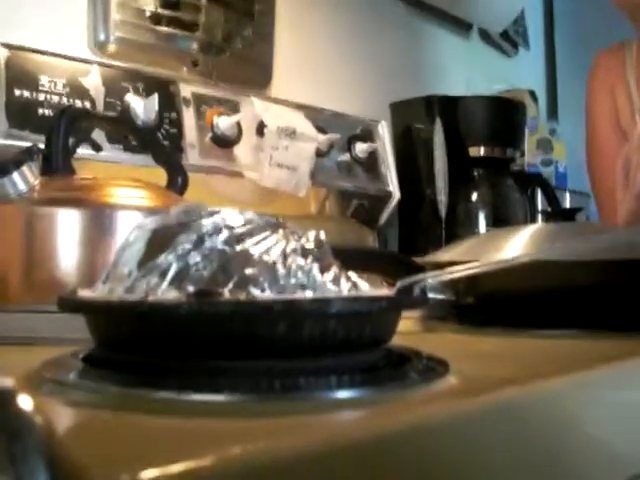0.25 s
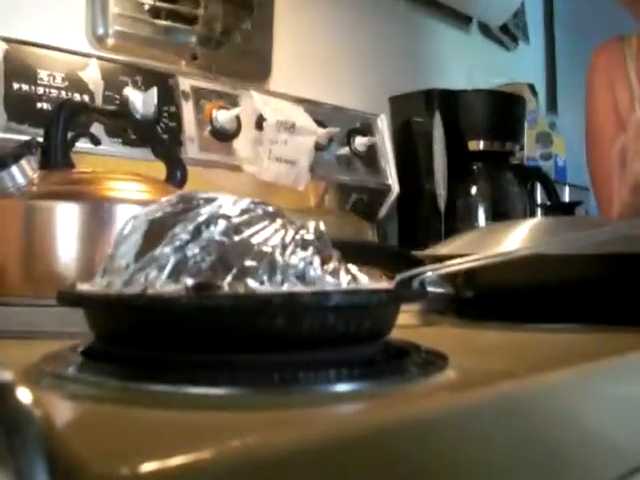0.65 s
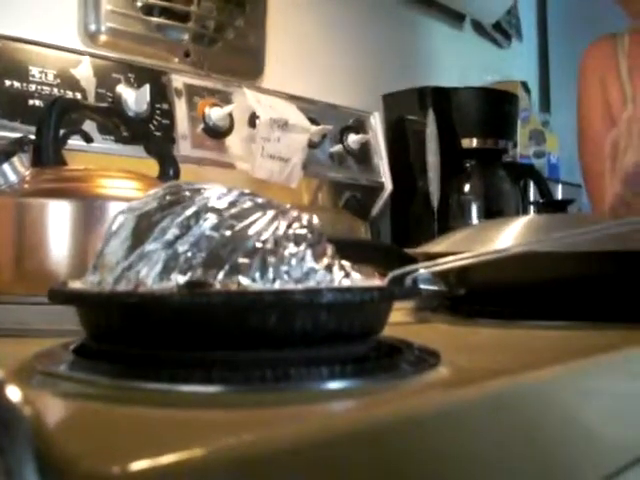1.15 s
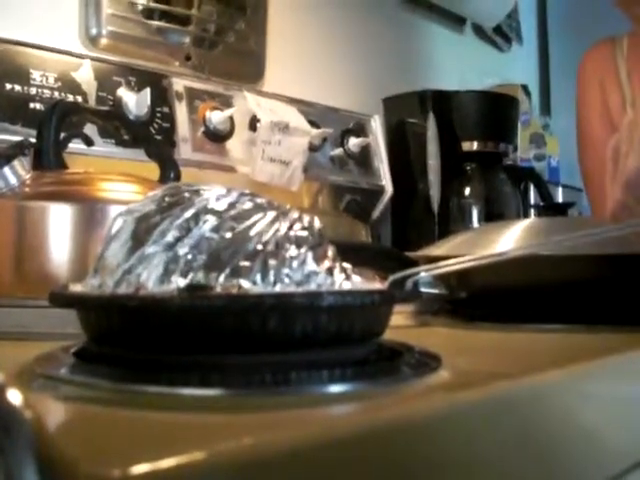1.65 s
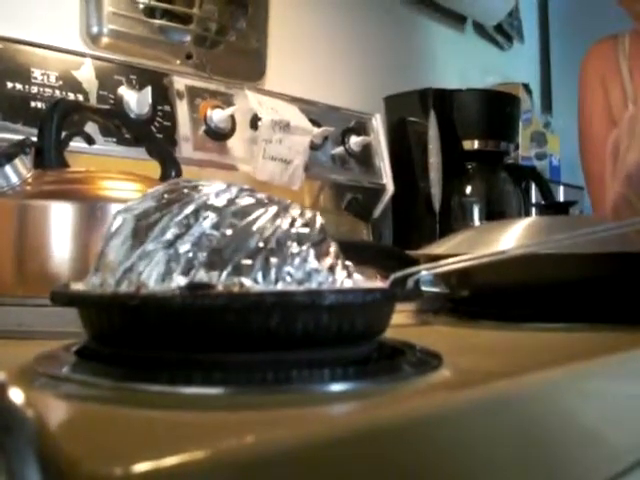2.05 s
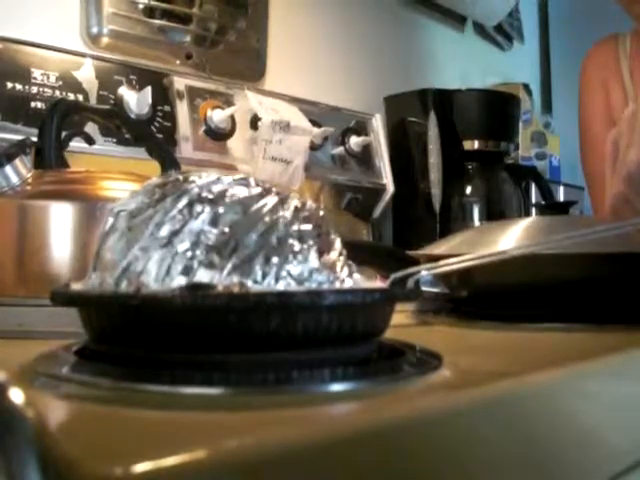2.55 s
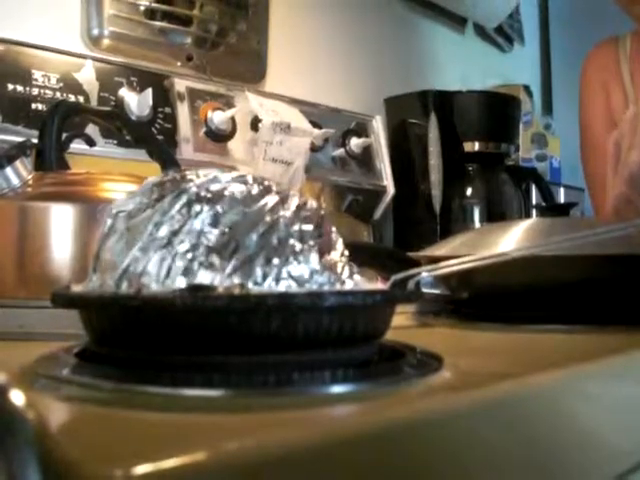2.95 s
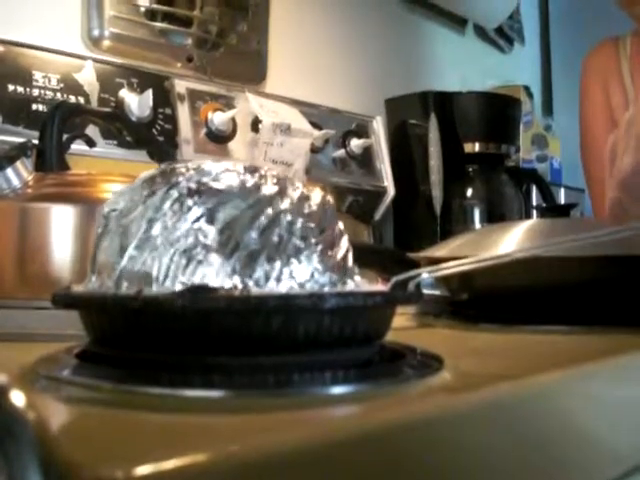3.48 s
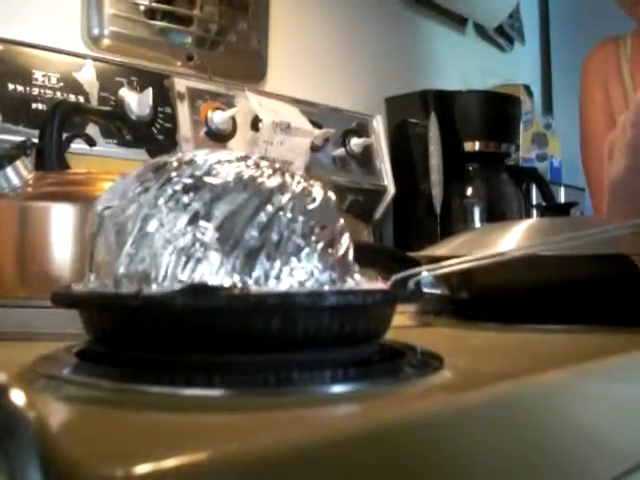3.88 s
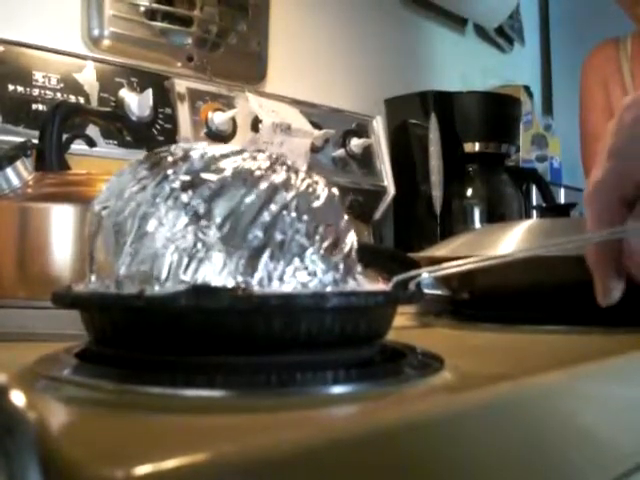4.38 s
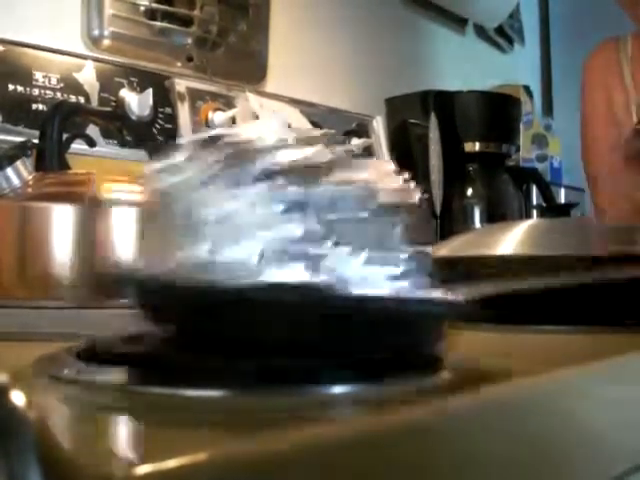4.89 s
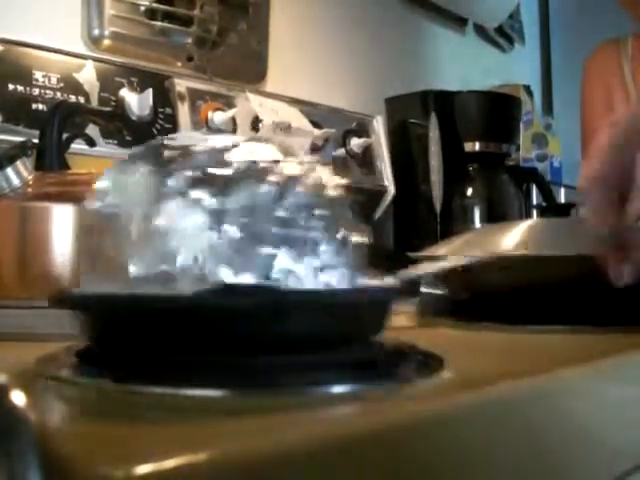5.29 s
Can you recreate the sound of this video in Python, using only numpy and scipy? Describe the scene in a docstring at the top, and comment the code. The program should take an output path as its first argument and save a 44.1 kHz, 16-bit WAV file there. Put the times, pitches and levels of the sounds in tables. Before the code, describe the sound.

Popcorn bursts in a foil-domed pan on a stove: sharp bright cracks with short metallic rustles and soft thuds, irregularly spaced, then denser after three seconds. Faint oil sizzle dips and returns. From about 4.6 seconds the pan is shaken, scraping back and forth ever faster with rattling kernels. Close microphone, small dry kitchen, very faint hum.

```python
"""Popcorn pops in a foil-domed pan on an electric stove, over faint appliance hum and room air.
Throughout, oil sizzles: filtered random impacts whose level sinks in the first half, then revives unevenly.
Pops, and sharp follow-up hits of kernels on the dome, each sound as a crack, foil rustle, puff and thud;
ticks of the swelling foil (damped modes) and dull knocks of landing corn (noise bursts) fall between.
Near the end the shaken pan scrapes in quickening strokes: grit noise gated by the speed of the hand."""
import sys
import numpy as np
from scipy import signal
from scipy.fft import rfft, irfft, next_fast_len
from scipy.io import wavfile
from scipy.ndimage import map_coordinates

SR = 44100
rng = np.random.default_rng(int(sys.argv[2]) if len(sys.argv) > 2 else 0)


def to_wav(sig):
    """Store sig (one row per channel, or 1-D mono) as 16-bit WAV at the path in sys.argv[1].

    Samples outside -1..1 are clipped; the rate is SR.
    """
    pcm = np.clip(np.atleast_2d(sig), -1, 1) * 32767
    pcm = np.round(pcm).astype(np.int16)
    wavfile.write(sys.argv[1], SR, pcm.T)  # frames by channels


N = 243873
TIME = np.arange(N) / SR
AGE = np.arange(SR // 8) / SR  # time since the start of one hit [s]

# strikes, which are pops and the sharp follow-up hits of kernels on the dome:
# (time [s], crack level [dB], crack pitch [Hz], foil rustle level [dB], thud level [dB])
STRIKES = [(.215, -18, 3490, -27, -38), (0.2448, -24, 3900, -36.5, -52.5), (.394, -43, 3440, -37, -49.5),
           (.584, -19.5, 4260, -27, -40), (0.8245, -19.5, 4130, -27, -40), (.853, -11, 3620, -25.5, -41),
           (1.0132, -37, 3450, -34.5, -49), (1.2875, -20, 4620, -33.5, -46),
           (1.94, -17.5, 3770, -37.5, -52), (1.9557, -45, 3520, -42, -53), (1.972, -38, 3900, -39, -57),
           (2.0846, -21.5, 3380, -23, -50), (2.1265, -27.5, 4760, -35.5, -52),
           (2.1501, -39, 3500, -40, -47.5), (2.4871, -29, 3330, -45.5, -53.5),
           (2.5036, -36.5, 4300, -46.5, -76), (2.5708, -21, 3450, -29, -63), (2.6102, -30, 3980, -39, -64),
           (2.8113, -24, 4120, -40, -55), (3.0442, -23, 3100, -35.5, -43.5),
           (3.0708, -24.5, 3220, -38, -48.5), (3.1092, -40, 3420, -27, -34),
           (3.1404, -40, 4630, -42.5, -50.5), (3.1843, -26, 3900, -32.5, -53.5),
           (3.3108, -12.5, 3200, -36, -41.5), (3.448, -42, 4850, -38, -44.5),
           (3.588, -24.5, 4340, -35.5, -41), (3.6014, -21, 3500, -33, -49), (3.619, -26.5, 3170, -35, -39),
           (3.7735, -31.5, 3650, -34, -44), (3.9086, -17.5, 5040, -27.5, -45.5),
           (4.0345, -50, 3970, -41.5, -50.5), (4.169, -52, 3330, -38.5, -49),
           (4.3274, -21, 4530, -30.5, -54), (4.3939, -20.5, 3470, -31, -43), (4.5127, -38, 4070, -50, -51),
           (4.8364, -26, 4160, -31, -48), (4.8432, -19.5, 4400, -33, -46.5),
           (5.0096, -34, 3900, -35.5, -53), (5.176, -22.5, 2730, -31, -49.5), (5.3412, -24, 4630, -31, -48),
           (5.3611, -29, 3740, -35.5, -55), (5.4479, -23, 3600, -45, -48),
           (5.4662, -26.5, 3930, -36.5, -50), (5.499, -41, 4430, -38, -42.5)]
# creases of the foil snapping over: (time [s], level [dB], pitch [Hz])
FOIL_SNAPS = [(.292, -37.5, 2580), (0.4145, -30, 2700), (.4455, -23.5, 2980), (.7106, -31, 2900),
              (.75, -45, 3800), (.954, -43, 3600), (2.2537, -43.5, 2950), (2.644, -38, 3110),
              (2.914, -37, 4300), (3.158, -33, 3900), (3.5017, -41.5, 3000), (3.664, -37.5, 3370),
              (3.7011, -34, 3020), (3.7127, -36.5, 3000), (3.8411, -24.5, 3040), (3.987, -36, 3630),
              (4.0084, -21, 3340), (4.052, -33.5, 3300), (4.278, -45, 4250), (4.5548, -36.5, 3600),
              (5.027, -28.5, 4200), (5.2175, -32, 3650), (5.293, -29, 3260)]
# knocks of corn against the pan: (time [s], level [dB], pitch [Hz])
LANDINGS = [(.282, -39.5, 950), (.524, -45, 497), (.638, -36, 753), (.678, -42, 935), (.792, -46.5, 900),
            (.94, -45, 890), (1.028, -36.5, 627), (1.086, -45.5, 920), (1.397, -43.5, 965),
            (1.44, -42.5, 900), (2.022, -38.5, 970), (2.0869, -22.5, 930), (2.215, -50.5, 838),
            (2.83, -44, 450), (3.06, -35, 397), (3.335, -35.5, 590), (3.462, -36.5, 646),
            (3.504, -42.5, 526), (3.798, -30.5, 420), (4.254, -45.5, 760), (4.486, -37, 530)]
# effort of the shaking hand: (time [s], level [dB])
EFFORT = [(4.4, -69), (4.55, -52), (4.66, -48.5), (4.74, -44), (4.9, -38), (5.22, -37), (5.53, -40.5)]
# strength of the sizzling oil: (time [s], level [dB])
OIL_LEVEL = [(0, -59), (1.1, -61), (1.7, -66.5), (2.4, -69), (3.3, -61), (4.1, -64), (5.53, -58)]

# The spectra give relative levels.
# crumpled foil: (frequency [Hz], level [dB per Hz])
FOIL_SPECTRUM = [(60, -28), (150, -45), (300, -27), (600, -19.5), (900, -15.5), (1500, -11), (2300, -4),
                 (3200, 0.5), (4400, -2.5), (6000, -6), (8000, -11.5), (12000, -18)]
# corn tumbling against the dome: (frequency [Hz], level [dB per Hz])
THUD_SPECTRUM = [(35, -29), (75, -21), (165, -16), (260, -18.5), (370, -0.5), (500, 2), (630, 0.5),
                 (820, 1.5), (1050, -2.5), (1500, -5.5), (3000, -2), (8000, -76)]
# low puff: (frequency [Hz], level [dB per Hz])
PUFF_SPECTRUM = [(30, -30), (55, -15), (75, -7), (110, -1.5), (170, 2), (250, -4.5), (400, -11.5),
                 (900, -38), (3000, -69)]
# pan sliding on the burner: (frequency [Hz], level [dB per Hz])
SCRAPE_SPECTRUM = [(40, -47), (80, -16.5), (170, -6.5), (270, -17), (400, -9.5), (700, -5.5), (1010, -3.5),
                   (1700, -10), (2500, -4.5), (3400, 1), (4500, -3), (5800, -13.5), (8000, -21),
                   (12000, -29.5)]
# hard kernels on the pan: (frequency [Hz], level [dB per Hz])
KERNEL_SPECTRUM = [(60, -52), (250, -12), (450, -10), (650, -9.5), (920, 1), (1500, -4), (2300, -10),
                   (3100, 6), (5000, -18), (12000, -36)]
# hot oil: (frequency [Hz], level [dB per Hz])
SIZZLE_SPECTRUM = [(200, -7), (900, 6), (1600, -1.5), (3400, 4.5), (4800, 6.5), (7000, -2.5), (9000, -12),
                   (12000, -9.5)]
# air of the kitchen: (frequency [Hz], level [dB per Hz])
KITCHEN_SPECTRUM = [(25, 0), (45, -21), (70, -15), (95, 1), (130, -14), (190, -1.5), (300, -13.5),
                    (390, -2.5), (520, -13), (1000, -17.5), (2500, -12), (12000, -23.5)]
# appliance tones: (frequency [Hz], mean peak level [dB])
HUM_TONES = [(70, -79), (119, -81), (241, -78), (381, -78)]
# resonances of the pan and its dome: (frequency [Hz], width [Hz], boost of each alone [dB])
PAN_MODES = [(167, 50, 0), (369.3, 22, 3.5), (494, 25, 2.5), (810, 62, 1.5), (1030, 43, 4),
             (3290, 254, 2.5), (4195, 41, 0.5)]
# decay of the diffuse tail: (frequency [Hz], time to fall by 60 dB [s])
ROOM_DECAY = [(150, 0.34), (900, 0.26), (3500, 0.13), (7000, 0.17), (12000, 0.2)]
# echoes of stove top, back panel and hood: (mean delay [s], level [dB])
WALL_ECHOES = [(.0027, -15.5), (.0052, -25.5), (.0061, -18), (0.0095, -30)]

# Delays, levels and pitches of the next three are typical values, scattered from strike to strike.
# a light tick just ahead of the strike: lead time, pitch, level relative to the rustle
LEAD_S, LEAD_HZ, LEAD_DB = .004, 3640, -14.5
# a low knock on the dome soon after: delay, pitch, level relative to the thud
DOME_S, DOME_HZ, DOME_DB = .021, 478, -2
# corn drops back into the pan: delay, pitch, level relative to the rustle
FALL_S, FALL_HZ, FALL_DB = 0.068, 900, -17
PUFF_DB = -11.5  # low puff, relative to the thud
# a higher crack brings a brighter rustle
TREBLE_DB, TREBLE_DB_PER_OCTAVE, USUAL_CRACK_HZ = -3, 21, 3720
# kick of a usual strike on the pan; dB more per dB of rustle and of thud
KICK_DB, KICK_WITH_RUSTLE, KICK_WITH_THUD = -48, .7, 0.51
USUAL_RUSTLE_DB, USUAL_THUD_DB = -36.5, -48.5
# middle of a stroke, stroke rate at that moment, steady rise of the rate
STROKE_MIDDLE_S, STROKES_PER_S, QUICKEN_PER_S2 = 4.56, 11.3, 2.53
STROKE_WIDTH, SLIDE_DB = 0.3, -11  # half length in periods; corn sliding on between the strokes
RATTLE_PER_S, RATTLE_DB = 150, -8.5  # hard kernels in the shaken pan, relative to the scrape
CALM, SETTLE_S = 0.071, .12  # unrest of the heap between strikes; time constant of settling after one
BAND_LIMIT_HZ = 12250


def strikes():
    """Impulsive excitation: a pop or a sharp hit on the dome cracks, kicks the pan, rustles, puffs and thuds."""
    track = np.zeros(N)
    size = len(AGE)
    for s, crack_db, hz, rustle_db, thud_db in STRIKES:
        snap = amp(crack_db) * crack(hz, t60=0.0073, edge_db=-11, pan_db=-26.0)

        treble_db = TREBLE_DB + TREBLE_DB_PER_OCTAVE * np.log2(hz / USUAL_CRACK_HZ)
        foil = amp(rustle_db) * rustle(hz, treble_db)

        more_rustle_db = rustle_db - USUAL_RUSTLE_DB
        more_thud_db = thud_db - USUAL_THUD_DB
        kick_db = KICK_DB + KICK_WITH_RUSTLE * more_rustle_db + KICK_WITH_THUD * more_thud_db
        pan_modes = ring(rng.uniform(695, 893), 0.045) + ring(rng.uniform(950, 960), 0.028)
        kick = amp(kick_db) * sized(pan_modes, 0.0069)

        bumps = grains(rate=700, spread_db=4.5, size=size) + 0.11 * rng.standard_normal(size)
        onset = 1 - np.exp(-AGE / 0.0019)  # the tumbling takes a moment to build up
        tumble = bumps * onset * amp(-60 * AGE / 0.08)
        thud = amp(thud_db) * sized(coloured(tumble, THUD_SPECTRUM), 0.042)

        breath = rng.standard_normal(size) * amp(-60 * AGE / 0.057)
        puff = amp(thud_db + PUFF_DB) * sized(coloured(breath, PUFF_SPECTRUM), 0.029)
        add(track, s, in_room(snap + foil + kick + thud + puff, wet_db=-13))
    return track


def crack(hz, t60, edge_db, pan_db):
    """Modal excitation: a sudden blow rings two close crease modes, a sharp edge and the hollow of the pan."""
    low_mode = ring(hz * rng.uniform(.93, .99), t60)
    high_mode = ring(hz * rng.uniform(1.1, 1.167), 0.35 * t60)
    crease = sized(low_mode + 0.77 * high_mode, 0.89)
    burst = rng.standard_normal(len(AGE)) * amp(-60 * AGE / .007)
    edge = sized(coloured(burst, [(100, -19), (700, 6.0), (4000, 12), (12000, -5.5)]), 0.53)
    hollow = ring(rng.uniform(746, 1350), 0.015)
    return sized(crease + amp(edge_db) * edge + amp(pan_db) * hollow, 0.0014)


def rustle(hz, treble_db):
    """Noise and chained buckling: the foil hisses and a quick chain of smaller crease cracks runs through it."""
    size = len(AGE)
    spray = rng.standard_normal(size) * amp(4.4 * wobble(909, size) - 60 * AGE / 0.07)
    spray = coloured(own_colour(spray, depth_db=2), FOIL_SPECTRUM)
    moments = np.cumsum(rng.uniform(.0008, .0035, size=10))
    buckles = np.zeros(size)
    buckles[(moments * SR).astype(int)] = amp(5.7 * rng.standard_normal(len(moments)) - 60 * moments / 0.031)
    small_crack = crack(hz, t60=0.0028, edge_db=-8.0, pan_db=-18)
    chain = signal.fftconvolve(buckles, small_crack)[:size]
    mixed = sized(spray, 1) + .6 * sized(chain, 1)
    return sized(coloured(mixed, [(3500, 0.0046), (8000, treble_db)]), 0.017)


def own_colour(x, depth_db):
    """Irregular modal response: every spot of the crumpled dome favours different frequencies."""
    hz = np.geomspace(200, 12000, 22)
    return coloured(x, np.column_stack([hz, depth_db * rng.standard_normal(len(hz))]))


def foil_snaps():
    """Snap-through buckling: creases of the dome flip over, and a like tick leads each strike."""
    track = np.zeros(N)
    lead_ticks = with_strikes("rustle", -LEAD_S, LEAD_DB, LEAD_HZ, scatter=.3)
    for s, db, hz in FOIL_SNAPS + lead_ticks:
        tick = crack(hz, t60=0.0045, edge_db=-8.5, pan_db=-11.5)
        tick = coloured(tick, [(hz / 2, -5), (hz, 0), (2 * hz, -6), (3 * hz, -15)])
        add(track, s, in_room(amp(db) * sized(tick, 0.0014), wet_db=-8.5))
    return track


def landings():
    """Soft, heavily damped impact: corn lands on several lobes in turn, a dull, barely ringing knock."""
    track = np.zeros(N)
    on_dome = with_strikes("thud", DOME_S, DOME_DB, DOME_HZ, scatter=.2)
    in_pan = with_strikes("rustle", FALL_S, FALL_DB, FALL_HZ, scatter=.3)
    for s, db, hz in LANDINGS + on_dome + in_pan:
        lobes = rng.standard_normal(len(AGE)) * amp(-60 * AGE / 0.017)
        spectrum = [(hz / 4, -16), (0.78 * hz, -7), (hz, 0), (1.5 * hz, -9), (4 * hz, -23), (12000, -45)]
        knock = coloured(lobes, spectrum)
        add(track, s, in_room(amp(db) * sized(knock, 0.0012), wet_db=-10.0))
    return track


def with_strikes(column, delay_s, level_db, hz, scatter):
    """Correlated events: each strike yields one (s, dB, Hz) event tied to its rustle or thud, with scatter."""
    events = []
    for s, _, _, rustle_db, thud_db in STRIKES:
        late, loud, high = rng.standard_normal(3)
        source_db = {"rustle": rustle_db, "thud": thud_db}[column]
        moment = s + delay_s * np.exp(scatter * late)
        events.append((moment, source_db + level_db + 2 * loud, hz * np.exp(0.15 * high)))
    return events


def shaking():
    """Sliding friction: the pan scrapes in quickening strokes as corn slides and hard kernels rattle."""
    elapsed = TIME - STROKE_MIDDLE_S
    strokes = STROKES_PER_S * elapsed + QUICKEN_PER_S2 * elapsed ** 2 / 2
    speed = np.exp(-((strokes - np.round(strokes)) / STROKE_WIDTH) ** 2)
    grit = unit(coloured(grains(rate=5000, spread_db=3.5, size=N), SCRAPE_SPECTRUM))
    kernels = grains(rate=RATTLE_PER_S, spread_db=4, size=N)
    rattle = amp(RATTLE_DB) * unit(coloured(kernels, KERNEL_SPECTRUM))
    effort = amp(curve(EFFORT) + 1.3 * wobble(90, N))  # very faint until the shaking sets in
    return in_room((grit + rattle) * (speed + amp(SLIDE_DB)) * effort, wet_db=-8)[:N]


def jostling():
    """Relaxing impact rate: taps and crinkles come more often after each strike, most after a loud rustle."""
    unrest = CALM
    for s, _, _, rustle_db, _ in STRIKES:
        settling = (TIME > s) * np.exp(-np.abs(TIME - s) / SETTLE_S)
        unrest = unrest + amp(rustle_db - USUAL_RUSTLE_DB) * settling
    taps = amp(-34.5) * coloured(grains(rate=38 * unrest, spread_db=0.5, size=N), KERNEL_SPECTRUM)
    crinkle = amp(-46.5) * coloured(grains(rate=120 * unrest, spread_db=4.5, size=N), FOIL_SPECTRUM)
    return in_room(taps + crinkle, wet_db=-5.5)[:N]


def sizzle():
    """Random impulse noise: hot oil fizzes finely under the foil, with single larger spits."""
    fizz = unit(coloured(grains(rate=1800, spread_db=3.0, size=N), SIZZLE_SPECTRUM))
    fizz = fizz * amp(3.9 * wobble(7.2, N))
    spits = unit(coloured(grains(rate=45, spread_db=3.5, size=N), FOIL_SPECTRUM))
    oil = .76 * fizz + .55 * spits
    return in_room(oil * amp(curve(OIL_LEVEL)), wet_db=-9)[:N]


def kitchen():
    """Stationary background: steady tones wavering in level and phase, and gently surging broadband air."""
    hum = np.zeros(N)
    for hz, db in HUM_TONES:
        level = amp(db + 4.1 * wobble(9.2, N))
        hum += level * np.sin(2 * np.pi * hz * TIME + 0.73 * wobble(14.0, N))
    air = unit(coloured(rng.standard_normal(N), KITCHEN_SPECTRUM))
    return hum + amp(-69.0 + 2.2 * wobble(3.64, N)) * air


def through_pan(x):
    """Resonant filtering: everything inside shares the modes of the pan and its dome."""
    m = next_fast_len(N + SR // 2)
    f = np.fft.rfftfreq(m, 1 / SR)
    response = 1
    for hz, width, db in PAN_MODES:
        damping = 1j * f * width
        response = response + (amp(db) - 1) * damping / (hz * hz - f * f + damping)
    return irfft(rfft(x, m) * response, m)[:N]


def in_room(x, wet_db):
    """Reflection and diffusion: close surfaces answer within milliseconds, then a short tail, new each call."""
    hz, t, z = signal.stft(rng.standard_normal(SR // 4), SR, nperseg=256)
    decay = amp(-60 * t / along(ROOM_DECAY, hz)[:, None])
    onset = 1 - np.exp(-t / 0.00048)
    tail = signal.istft(z * decay * onset, SR, nperseg=256)[1]
    paths = amp(wet_db) * tail / np.linalg.norm(tail)
    paths[0] = 1  # direct sound
    for delay, db in WALL_ECHOES:
        paths[round(abs(delay + rng.normal(0, .0002)) * SR)] += amp(db)
    return signal.fftconvolve(x, paths)


def ring(hz, t60):
    """Damped oscillation: swells within one cycle and radiates little far below its pitch."""
    swell = 1 - np.exp(-AGE * hz / 0.31)
    swing = np.sin(2 * np.pi * hz * AGE) * amp(-60 * AGE / t60) * swell
    return sized(np.diff(swing, prepend=0), 0.65)


def grains(rate, spread_db, size):
    """Poisson-like impacts: rate per second, of either sign, a few much larger than the rest."""
    hits = rng.random(size) < rate / SR
    signs = rng.choice([-1, 1], size)
    return hits * signs * amp(spread_db * np.minimum(rng.exponential(size=size), 4))


def wobble(rate, size):
    """Band-limited fluctuation: a smooth random curve, rate knots a second."""
    return map_coordinates(rng.standard_normal(size // 16), [np.arange(size) * rate / SR], mode="wrap")


def coloured(x, points):
    """Minimum-phase filtering: a causal filter with the given (Hz, dB) spectrum."""
    m = 2 * next_fast_len(len(x) // 2 + 2048)
    cepstrum = irfft(np.log(amp(along(points, np.fft.rfftfreq(m, 1 / SR)))))
    cepstrum[1:m // 2] *= 2  # folding the cepstrum makes the filter causal
    cepstrum[m // 2 + 1:] = 0
    return irfft(rfft(x, m) * np.exp(rfft(cepstrum)), m)[:len(x)]


def along(points, hz):
    """Logarithmic interpolation: read (Hz, value) points on a log frequency axis."""
    f, v = np.transpose(points)
    return np.interp(np.log(hz + 1), np.log(f + 1), v)


def curve(rows):
    """Linear interpolation: one value per sample from (s, value) rows."""
    return np.interp(TIME, *np.transpose(rows))


def amp(db):
    """Logarithmic level: decibels to gain."""
    return 10 ** (np.asarray(db) / 20)


def unit(x):
    """Power normalisation: scale to rms 1."""
    return x / np.sqrt(np.mean(x ** 2) + 1e-20)


def sized(x, span):
    """Energy normalisation: a hit gets the energy of rms 1 held for span seconds."""
    return x / np.sqrt(np.sum(x ** 2) / (span * SR) + 1e-20)


def add(track, s, x):
    """Superposition: mix x into the track at time s."""
    part = track[round(s * SR):][:len(x)]
    part += x[:len(part)]


def scene():
    """Superposition of all sources: those on the stove pass through the pan, the kitchen does not."""
    hits = strikes() + foil_snaps() + landings()
    stove = hits + jostling() + shaking() + sizzle()
    return (through_pan(stove) + kitchen())[None]


def record(dry):
    """Saturation and band limiting: peaks are rounded, deep bass is shed, the top is cut steeply."""
    held = dry / (1 + np.abs(dry / .9) ** 4) ** (1 / 4)
    held = signal.sosfilt(signal.butter(3, 52, "highpass", fs=SR, output="sos"), held)
    m = next_fast_len(N + SR // 2)
    top_cut = 1 / (1 + (np.fft.rfftfreq(m, 1 / SR) / BAND_LIMIT_HZ) ** 150)
    return irfft(rfft(held, m) * top_cut, m)[..., :N]


dry = scene()
out = record(dry)
to_wav(out)
```